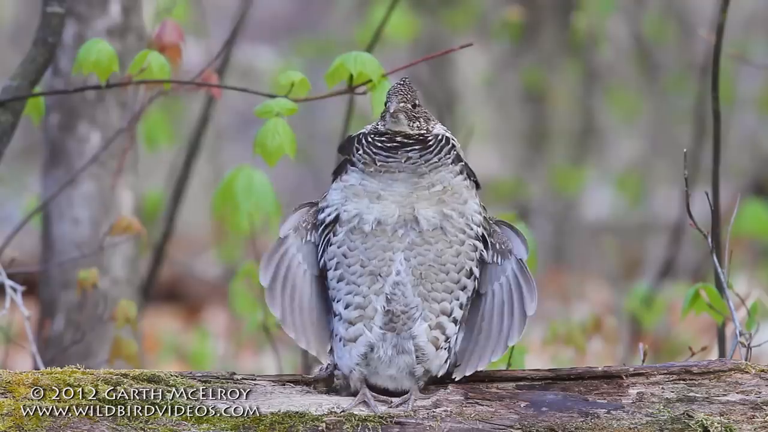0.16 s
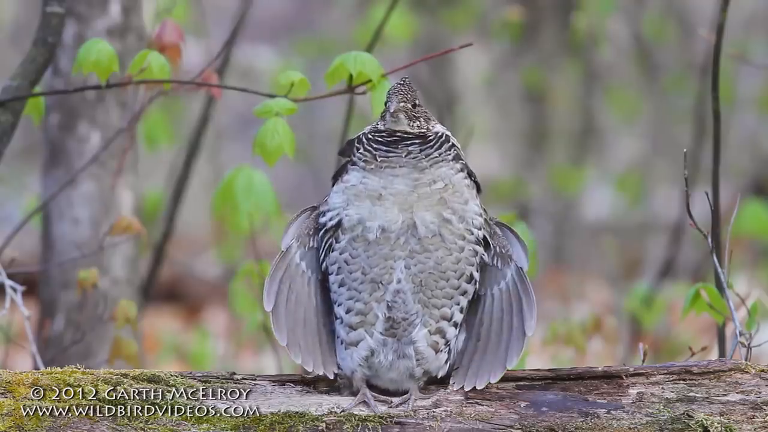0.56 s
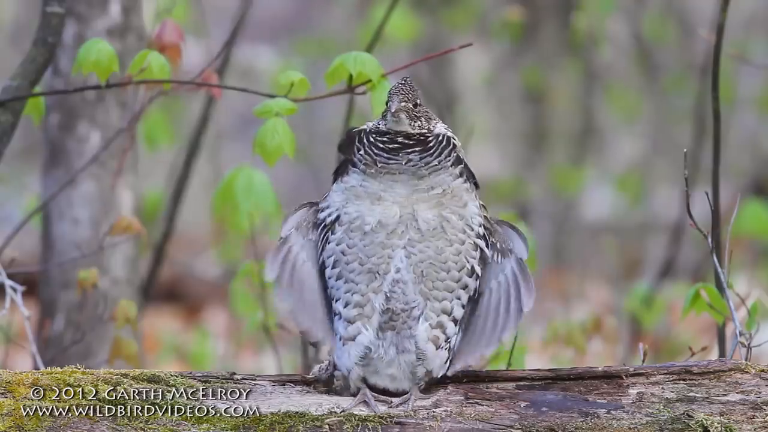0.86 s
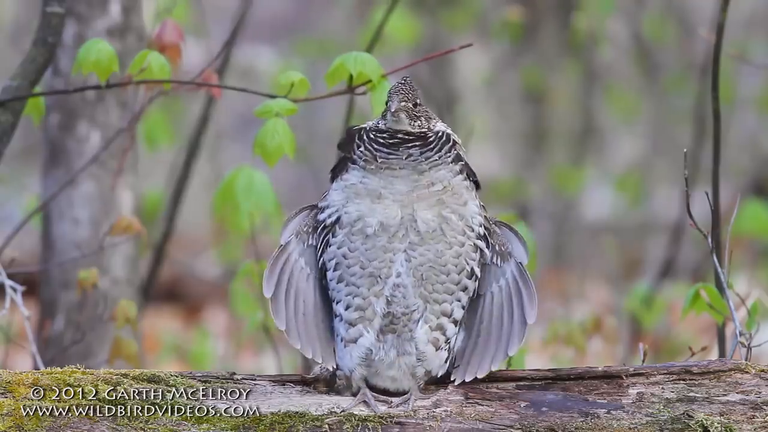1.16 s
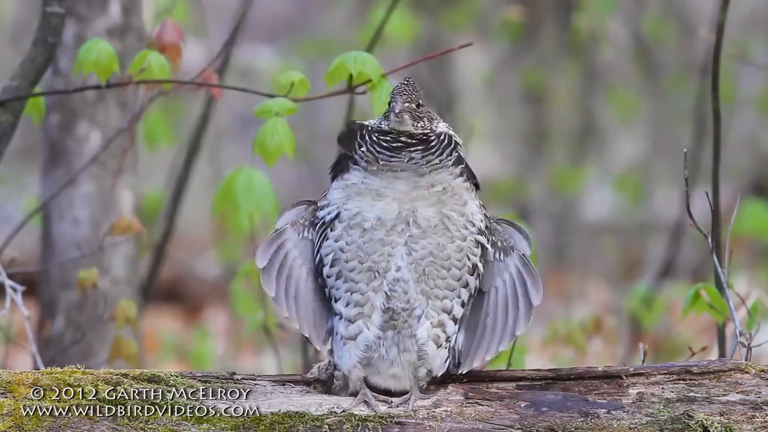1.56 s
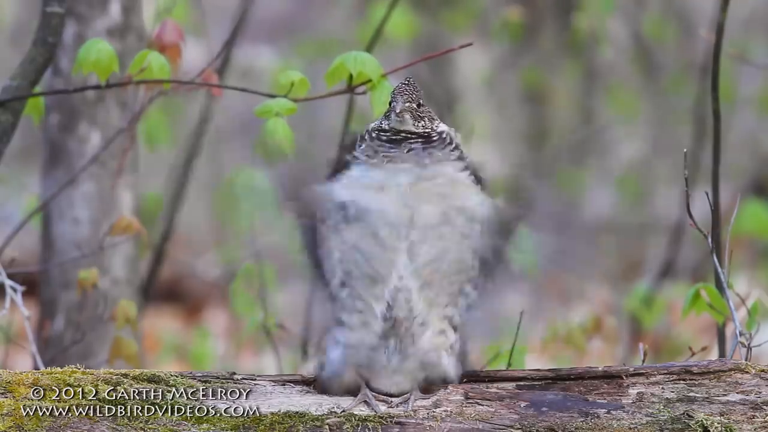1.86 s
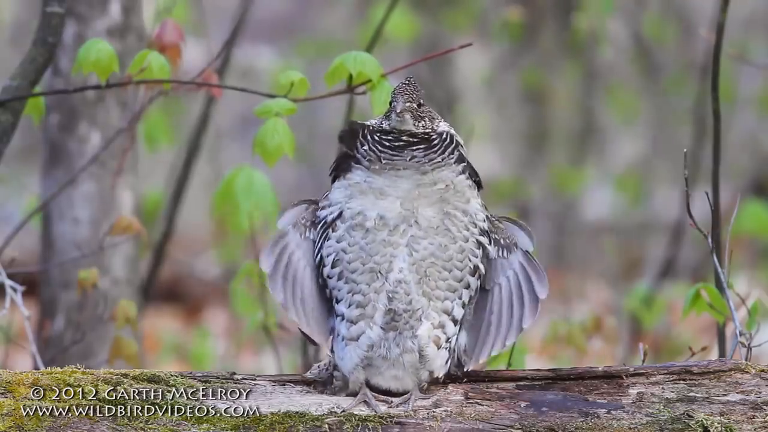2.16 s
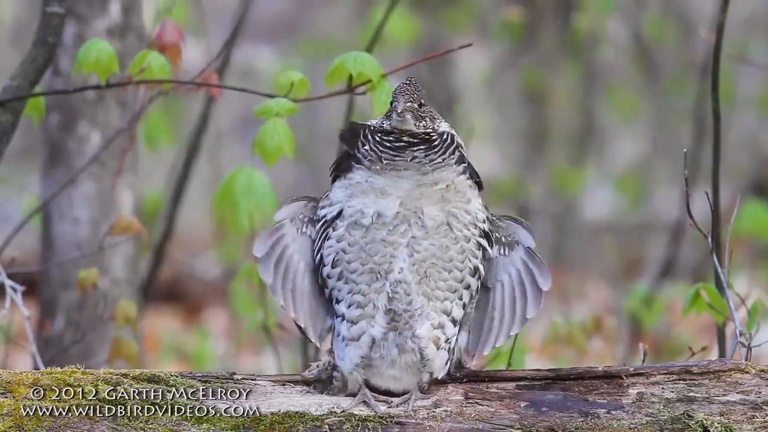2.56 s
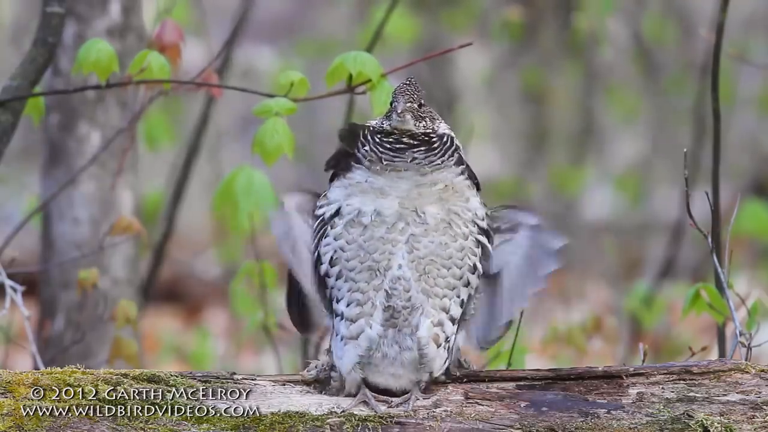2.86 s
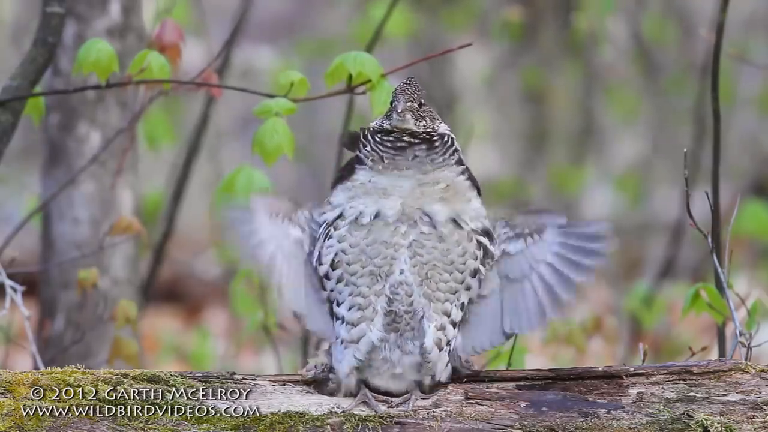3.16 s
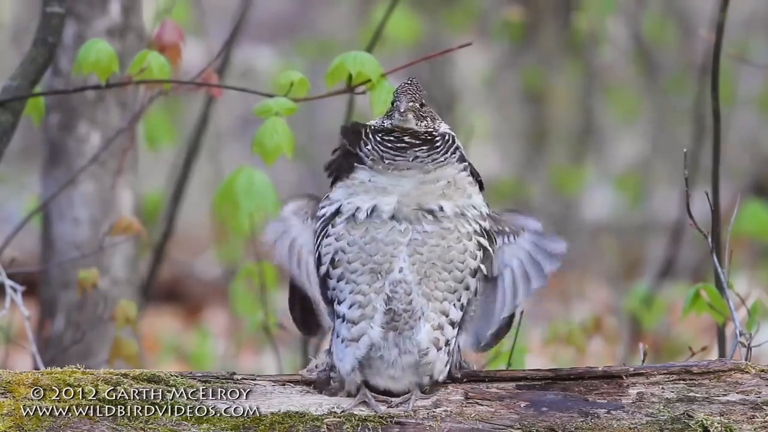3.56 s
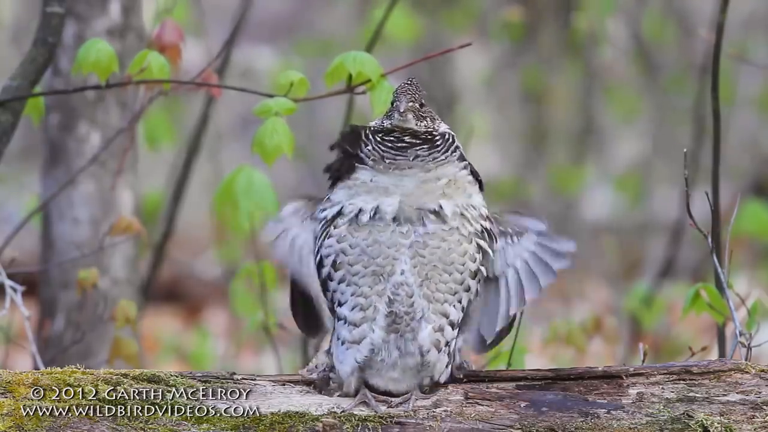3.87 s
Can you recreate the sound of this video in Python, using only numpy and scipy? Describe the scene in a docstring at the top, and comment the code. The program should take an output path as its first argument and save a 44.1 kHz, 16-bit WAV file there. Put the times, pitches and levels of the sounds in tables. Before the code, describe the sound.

A grouse drums low, muffled wing thumps, gradually faster, over quiet whistling songbirds and soft hiss

```python
"""Low rumble, microphone hiss and a blurred far chorus, all shaped noise, run throughout; from the start
songbirds whistle, as wavering sines, and soon buzz, as narrow noise bands, and chip, as short rising sines.
Then a grouse on a log drums, each wing beat sooner than the last: a pressure-pulse thump and a noise swish.
Small dry ticks and rattling notes, sines of fast-shaking pitch, join in; later a trill of falling sweeps
swells in from the left. Sparse random echoes stand for the trees."""
import sys
import numpy as np
from scipy import signal
from scipy.fft import rfft, irfft
from scipy.io import wavfile
from scipy.ndimage import uniform_filter1d

SR = 44100
rng = np.random.default_rng(int(sys.argv[2]) if len(sys.argv) > 2 else 0)


def invert_db(x):
    """Field ratio 10**(x/20) for x, a level in decibels (scalar or array-like)."""
    u = np.asarray(x, float) / 20
    return 10 ** u


def pcm_store(signal):
    """Save signal as 16-bit PCM."""
    levels = np.round(np.clip(np.atleast_2d(signal), -1, 1) * 32767)
    wavfile.write(sys.argv[1], SR, levels.astype(np.int16).T)


N = 176400  # samples, 4 s

# Wing beats: (time [s], strength [dB], stretch of the stroke [ratio],
# tip meeting relative to the beat, before stretch [s], pressure as the wings stop short [gain])
WING_BEATS = [(.76986, -10.7, 1.122, -.0055, .05), (1.41693, -9.9, 1.112, -.0054, .1),
              (1.95996, -9.3, 1.145, -.0053, .16), (2.42074, -9.2, 1.113, -.005, .19),
              (2.82044, -9.25, 1.208, -.0064, .1), (3.18008, -9.7, 1.28, -.0036, .28),
              (3.50532, -9., 1.254, -.0037, .3), (3.80468, -8.9, 1.161, -.0042, .27)]


def evened(x):
    """Scales to rms 1."""
    return x / np.sqrt(np.mean(x ** 2) + 1e-20)


def read_spectrum(points, hz):
    """Reads a (frequency [Hz], value) curve on a log-frequency axis."""
    f, value = np.transpose(points)
    return np.interp(np.log(hz + 1), np.log(f + 1), value)


def level_gain(curve):
    """Turns a (time [s], level [dB]) curve into a gain per sample."""
    return invert_db(np.interp(np.arange(N) / SR, *np.transpose(curve)))


def add(mix, s, sound):
    """Mixes a sound in at time s, cutting it at the end of the scene."""
    part = mix[..., max(round(s * SR), 0):][..., :sound.shape[-1]]
    part += sound[..., :part.shape[-1]]


def panned(x, pan_db):
    """Makes two channels with a level difference; above zero the left is louder."""
    return x * invert_db([[pan_db / 2], [-pan_db / 2]])


def faded(t, length, edge_s):
    """A straight fade in and out."""
    return np.clip(np.minimum(t, length - t) / edge_s, 0, 1)


def noise(spectrum, same, patchy_db, size=1024):
    """Stereo noise from random short-time spectra, with patches that drift over time and frequency."""
    hz = np.fft.rfftfreq(size, 1 / SR)
    a, b, c, d, patches = rng.standard_normal((4 * N // size + 5, len(hz), 5)).T
    patches = uniform_filter1d(patches, 6, axis=0)
    patches = evened(uniform_filter1d(patches, 16, axis=1))
    # the right channel shares part of the left, band by band
    same = np.clip(read_spectrum(same, hz), -1, 1)[:, None]
    left = a + 1j * b
    right = same * left + np.sqrt(1 - same ** 2) * (c + 1j * d)
    z = np.array([left, right])
    z *= invert_db(read_spectrum(spectrum, hz)[:, None] + patchy_db * patches)
    sound = signal.istft(z, nperseg=size, noverlap=3 * size // 4)[1]
    return evened(sound[:, :N])


def wood_echo(x, t60_s):
    """Diffuse echoes off many trees: sparse, decaying taps of random sign, other ones for each ear."""
    taps = np.zeros((2, SR))
    slots = np.arange(400, SR - 20, 20)
    at = slots + rng.integers(0, 20, (2, len(slots)))
    np.put_along_axis(taps, at, rng.choice([-1., 1.], at.shape), axis=1)
    taps *= invert_db(-60 * np.arange(SR) / SR / t60_s)
    return signal.fftconvolve(x[None], taps / np.linalg.norm(taps[0]), axes=1)[:, :N]


def low_rumble():
    """Low noise, most alike in both ears at the bottom."""
    # spectrum: (frequency [Hz], level [dB])
    rumble_spectrum = [(20, -13), (32, 1), (104, -0.5), (185, -9.5), (317, -17.5), (1500, -32), (1950, -76)]
    # slow swell: (time [s], level [dB])
    rumble_level = [(0, -56), (.5, -58), (2.1, -56.5), (4, -54.5)]
    # likeness of left and right: (frequency [Hz], correlation [0-1])
    rumble_same = [(110, 0.82), (380, 0.52)]
    sound = noise(rumble_spectrum, rumble_same, patchy_db=0.27, size=2048)
    return level_gain(rumble_level) * panned(sound, pan_db=2.5)


def microphone_hiss():
    """Steady bright noise, almost independent in the two channels and stronger on the right."""
    # spectrum: (frequency [Hz], level [dB])
    hiss_spectrum = [(1500, -12.5), (5500, -2.5), (12000, -7.5), (16000, -8)]
    sound = noise(hiss_spectrum, [(1, 0.0048)], patchy_db=2.2)
    return invert_db(-75.5) * panned(sound, pan_db=-2.4)


def far_chorus():
    """Distant birds blurred into patchy, band-shaped noise."""
    # spectrum: (frequency [Hz], level [dB])
    chorus_spectrum = [(1300, -11), (1650, -4), (2100, 1.5), (2900, 1), (3500, -6.5), (4600, -9.5),
                       (5300, -13.5), (5800, -29)]
    # slow swell: (time [s], level [dB])
    chorus_level = [(0, -64), (1.4, -65), (2.5, -64), (4, -64.5)]
    sound = noise(chorus_spectrum, [(1, 0.23)], patchy_db=2.0)
    return level_gain(chorus_level) * panned(sound, pan_db=0.5)


def whistle(curve):
    """A near sine follows a (time [s], pitch [Hz], level [dB]) curve with slight random waver."""
    waver_hz, flutter_db, edge_s = 14, 3, 0.005  # waver and flutter are rms
    s, hz, db = np.transpose(curve)
    t = np.arange(s[0], s[-1], 1 / SR)
    waver, flutter = (evened(uniform_filter1d(v, 330)) for v in rng.standard_normal((2, len(t))))
    phase = 2 * np.pi * np.cumsum(np.interp(t, s, hz) + waver_hz * waver) / SR
    gain = invert_db(np.interp(t, s, db) + flutter_db * flutter)
    gain *= faded(t - s[0], s[-1] - s[0], edge_s)
    return np.sqrt(2) * gain * np.sin(phase)  # sqrt(2) makes the levels rms


def whistles():
    """Whistled notes, nearly pure tones gliding in pitch from many sides."""
    # notes: (left-right difference [dB], [(time [s], pitch [Hz], level [dB]), ..])
    whistled_notes = [ (10, [(.08, 4330, -78), (.11, 4470, -73), (.28, 4450, -67.5), (.68, 4400, -75)]),
                      (-6, [(0, 3860, -66), (.06, 3910, -84)]), (5, [(2.258, 3120, -70),
                      (2.28, 2790, -71)]), (8, [(2.327, 3090, -71), (2.352, 2710, -72)]),
                      (-2, [(3.34, 2727, -70), (3.45, 2790, -69), (3.84, 2794, -71.5)]),
                      (15, [(3.62, 2690, -77), (3.69, 2590, -62)]), (-10, [(1.135, 4103, -70),
                      (1.4, 3955, -63.5), (1.72, 3890, -71)]), (-14.5, [(1.695, 3390, -71),
                      (1.73, 3500, -61.5), (1.87, 3455, -64.5), (1.95, 3543, -61), (2.165, 3520, -64)]),
                      (-9, [(3.587, 3120, -67), (3.755, 3194, -55.5), (3.775, 3160, -67),
                      (3.93, 3180, -71)]), (-10, [(3.54, 4030, -81), (3.85, 3840, -77)]),
                      (4, [(.17, 3346, -80), (.45, 3350, -75)]), (-11.5, [(.5, 1633, -56),
                      (.515, 2090, -66), (.535, 2201, -58), (.62, 2213, -56.5), (.645, 2220, -71)]),
                      (-9.5, [(.625, 3320, -67), (.65, 3430, -54.5), (.665, 3224, -59), (.675, 2760, -62.5),
                      (.69, 2860, -61)]), (-11, [(0.69, 1880, -64.5), (0.75, 1870, -58.5),
                      (0.94, 1861, -74.5)]), (11.5, [(1.035, 2590, -78), (1.063, 3050, -63),
                      (1.072, 2490, -65.5), (1.2, 2003, -80)]), (16.5, [(1.675, 2567, -61.5),
                      (1.71, 2574, -66.5), (1.735, 2540, -70)]), (16.5, [(1.84, 2640, -68),
                      (1.9, 2590, -62.5)]), (9, [(1.905, 2180, -70), (1.97, 2163, -67.5)]),
                      (10, [(2.224, 3550, -58), (2.242, 2795, -63.5), (2.27, 2560, -77)]),
                      (15, [(2.36, 3190, -59), (2.375, 2830, -70), (2.39, 2560, -67)]),
                      (11, [(2.69, 2590, -68), (2.82, 2572, -69)]), (6, [(3.125, 2590, -63),
                      (3.17, 2615, -65)]), (-7, [(3.3, 2523, -71), (3.346, 2478, -59.5),
                      (3.56, 2517, -66.5)]), (-6.5, [(3.415, 2085, -70), (3.52, 2070, -59),
                      (3.63, 2056, -70.5)]), ]
    out = np.zeros((2, N))
    for pan_db, curve in whistled_notes:
        add(out, curve[0][0], panned(whistle(curve), pan_db))
    return out


def buzz(length, hz, width_hz, db):
    """A hoarse note: a narrow band of noise that swells and fades."""
    t = np.arange(0, length, 1 / SR)
    f = np.fft.rfftfreq(len(t), 1 / SR)
    band_shape = np.exp(-(2 * (f - hz) / width_hz) ** 4)
    band = irfft(rfft(rng.standard_normal(len(t))) * band_shape, len(t))
    return invert_db(db) * evened(band) * faded(t, length, 0.081 * length)


def buzzes():
    """Buzzy notes, each a noise band, a little to the right."""
    # notes: (start [s], length [s], centre [Hz], width [Hz], level [dB])
    buzzy_notes = [(0.962, 0.4, 4760, 520, -74), (0.46, 1.45, 6770, 760.3, -86),
                   (2.673, 0.14, 2698, 275, -64), (2.87, .18, 3340, 320, -70),
                   (3.303, 0.23, 2630, 400, -67), (3.828, 0.182, 2513, 221.4, -61)]
    out = np.zeros((2, N))
    for s, *note in buzzy_notes:
        add(out, s, panned(buzz(*note), pan_db=-2))
    return out


def chips():
    """Thin chips far to the left: one short rising whistle, repeated."""
    # starts: (time [s], gain on the chip [dB])
    chip_starts = [(0.491, -77), (.905, -77)]
    # rise: (time in the chip [s], pitch [Hz], relative level [dB])
    chip_curve = [(0, 6350, -12), (.02, 7030, -13)]
    out = np.zeros((2, N))
    for s, db in chip_starts:
        add(out, s, panned(invert_db(db) * whistle(chip_curve), pan_db=34.0))
    return out


def bell(t, width):
    """A smooth hump in time, Gaussian in shape."""
    return np.exp(-.5 * (t / width) ** 2)


def wing_thump():
    """Closing wings push air out, their tips meet, they stop short, and a vacuum sucks as they snap back."""
    # times and widths before each beat's stretch
    push_gain, push_at_s, push_width_s = .462, -.00328, .00264
    clap_gain, clap_width_s = 0.057, 0.00063
    brake_at_s, brake_width_s = -.00153, .00089
    suck_at_s, suck_width_s = .0005, .00156
    t, thump = np.arange(N) / SR, np.zeros(N)
    for s, db, stretch, clap_at_s, brake_gain in WING_BEATS:
        u = (t - s) / stretch
        pressure = push_gain * bell(u - push_at_s, push_width_s)
        pressure += clap_gain * bell(u - clap_at_s, clap_width_s)
        pressure += brake_gain * bell(u - brake_at_s, brake_width_s)
        pressure -= bell(u - suck_at_s, suck_width_s)
        thump += invert_db(db) * pressure
    return thump


def feather_swish_gain():
    """Feathers swish as the wings close: a fast rise, then a double decay, louder as the roll quickens."""
    swish_db, grow_db_per_s = -49.5, 0.83  # swish under the thump
    lead_s, rise_s = 0.006, 0.0019  # peak ahead of the beat; rise time constant, both before stretch
    t60_s, tail_db, tail_t60_s = 0.054, -2.5, 0.12  # decays before stretch
    t, gain = np.arange(N) / SR, np.zeros(N)
    for s, thump_db, stretch, _, _ in WING_BEATS:
        u = (t - s) / stretch + lead_s
        after = np.maximum(u, 0)
        rise = np.exp(np.minimum(u, 0) / rise_s)
        fall = invert_db(-60 * after / t60_s) + invert_db(tail_db - 60 * after / tail_t60_s)
        gain += invert_db(thump_db + swish_db + grow_db_per_s * s) * rise * fall
    return gain


def litter_tick_gain():
    """Small dry ticks in the litter: an instant onset and a decay of 60 dB in 14 ms."""
    # ticks: (time [s], level [dB])
    litter_ticks = [(0.8497, -58), (2.6452, -62)]
    t, gain = np.arange(N) / SR, np.zeros(N)
    for s, db in litter_ticks:
        gain += invert_db(db - 60 * np.maximum(t - s, 0) / 0.014) * (t >= s)
    return gain


def wings_and_litter():
    """Thumps echo off ground and trunks; one bright noise carries both the swishes and the ticks."""
    # echoes off the ground and near trunks: (delay [s], level [dB])
    trunk_echoes = [(.0102, -24.3), (.0152, -26), (.021, -25.7)]
    # bright noise spectrum: (frequency [Hz], level [dB])
    swish_spectrum = [(1500, -9.5), (3900, -3.5), (6900, -5), (8500, 1), (11300, -3), (16000, -18.5)]
    thump = wing_thump()
    direct = thump.copy()
    for delay_s, db in trunk_echoes:
        direct += invert_db(db) * np.roll(thump, round(delay_s * SR))
    bright = noise(swish_spectrum, [(1, 0.77)], patchy_db=0.5, size=256)
    out = panned(direct, pan_db=3) + (feather_swish_gain() + litter_tick_gain()) * bright
    out[1] = np.roll(out[1], 2)  # the left ear leads by two samples
    return out + invert_db(-25.5) * wood_echo(thump, t60_s=0.4)


def rattle(length, hz, db):
    """A sine thrown up and down in pitch many times a second, uneven and sinking in level."""
    shakes_per_s, swing_hz = 60, 370
    t = np.arange(0, length, 1 / SR)
    pitch = hz - swing_hz * np.cos(2 * np.pi * shakes_per_s * t)
    phase = 2 * np.pi * np.cumsum(pitch) / SR
    uneven_db = 2.5 * evened(uniform_filter1d(rng.standard_normal(len(t)), 300))
    gain = invert_db(db + uneven_db - 6 * t / length)
    return gain * np.sin(phase) * faded(t, length, 0.005)


def rattles():
    """Rattling notes, sines of fast-shaking pitch, to the right."""
    # notes: (start [s], length [s], centre [Hz], starting peak level [dB])
    rattling_notes = [(0.974, 0.08, 3620, -63.5), (1.077, 0.07, 3620, -65)]
    out = np.zeros((2, N))
    for s, *note in rattling_notes:
        add(out, s, panned(rattle(*note), pan_db=-9))
    return out


def trill():
    """A trill from the left: one sweep, mostly falling, repeats evenly and grows to full level."""
    # sweep: (time in the sweep [s], pitch [Hz], relative level [dB])
    sweep_curve = [(0, 6300, 2), (.008, 6700, -4), (.017, 5500, 0), (.028, 5200, -1), (.065, 3550, 0)]
    start_s, gap_s, count, grow_s = 2.493, .1, 16, 0.4
    out = np.zeros((2, N))
    for k in range(count):
        grow = min((k + 1) * gap_s / grow_s, 1)
        sweep = grow * invert_db(-85) * whistle(sweep_curve)
        add(out, start_s + k * gap_s, panned(sweep, pan_db=17))
    return out


def birds():
    """All near singers, with the echo of the wood."""
    out = whistles() + buzzes() + chips() + rattles() + trill()
    return out + invert_db(-4.5) * wood_echo(out.mean(0), t60_s=1.73)


def scene():
    """Rumble, far chorus, near birds, and the drumming wings with the litter ticks."""
    return low_rumble() + far_chorus() + birds() + wings_and_litter()


def roll_off(x):
    """The treble ends steeply here."""
    return signal.sosfilt(signal.butter(12, 15710, fs=SR, output="sos"), x)


def record(dry):
    """The microphone cuts the lowest bass with a second-order high-pass and adds its hiss."""
    low_cut_hz, low_cut_q = 32.9, .636
    w = 2 * np.pi * low_cut_hz
    b, a = signal.bilinear([1, 0, 0], [1, w / low_cut_q, w * w], SR)
    mix = signal.lfilter(b, a, dry) + microphone_hiss()
    return roll_off(mix)


dry = scene()
out = record(dry)
pcm_store(out)
```